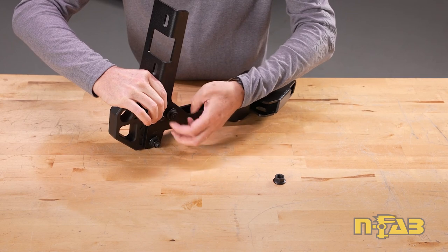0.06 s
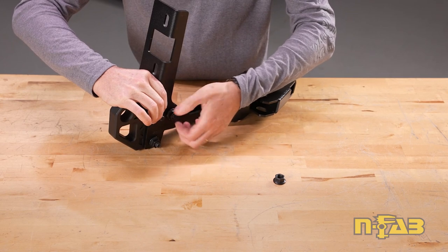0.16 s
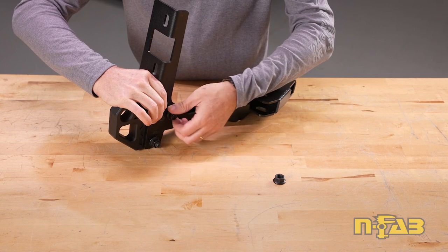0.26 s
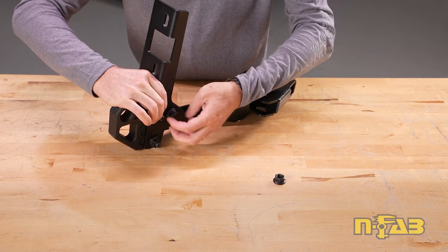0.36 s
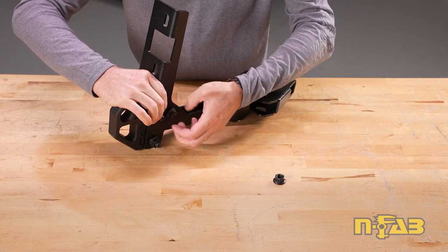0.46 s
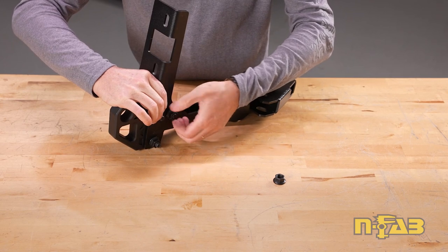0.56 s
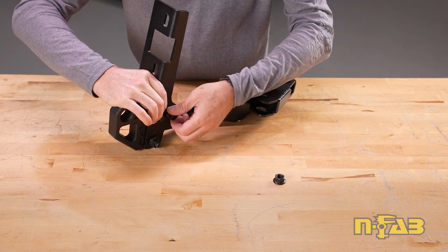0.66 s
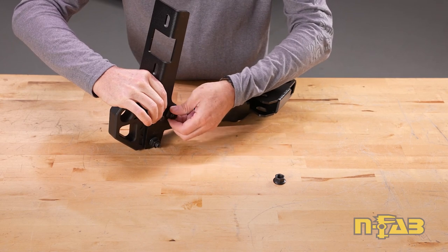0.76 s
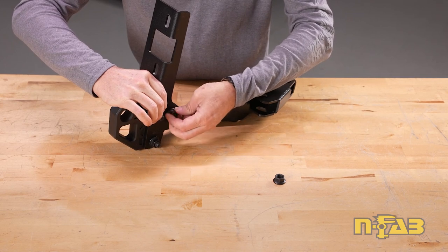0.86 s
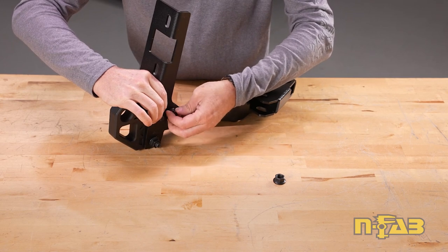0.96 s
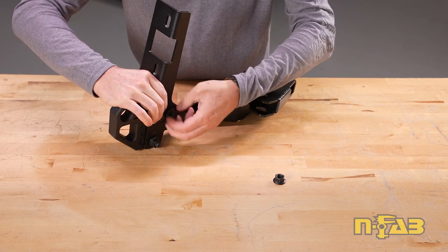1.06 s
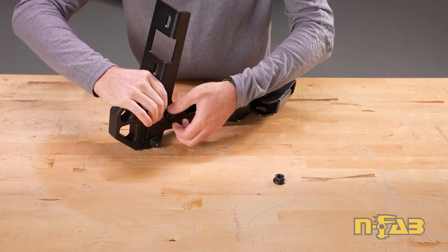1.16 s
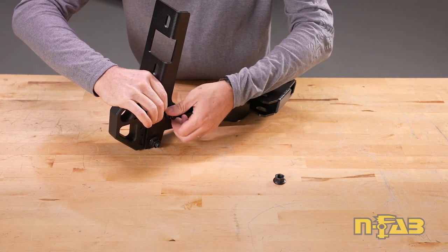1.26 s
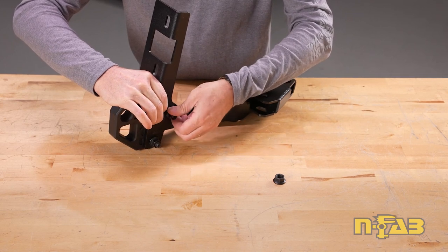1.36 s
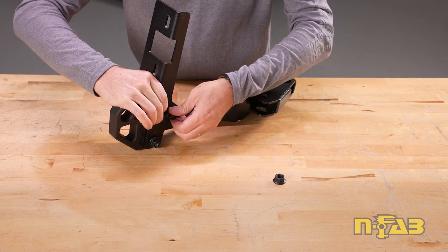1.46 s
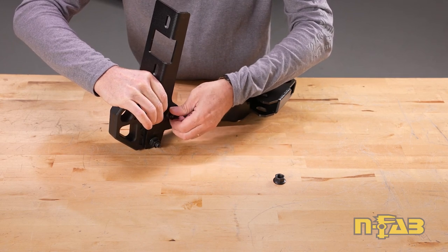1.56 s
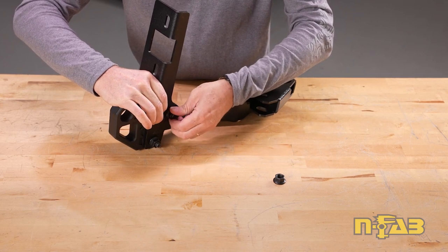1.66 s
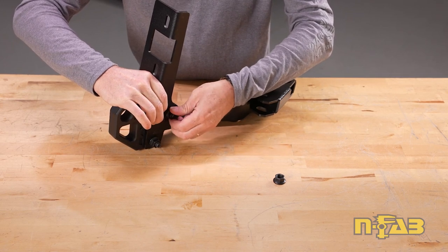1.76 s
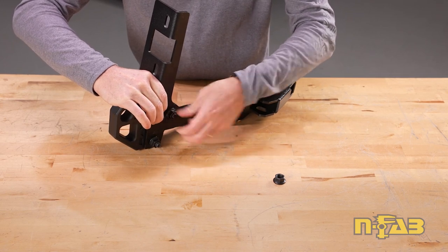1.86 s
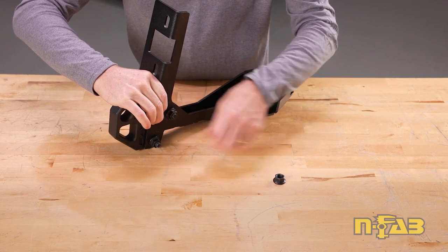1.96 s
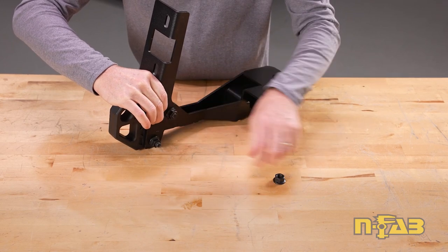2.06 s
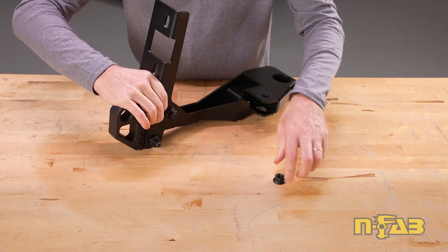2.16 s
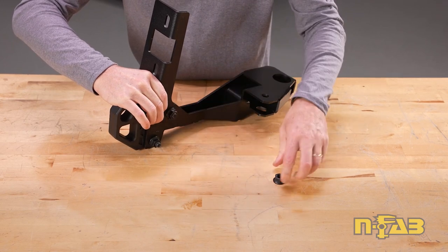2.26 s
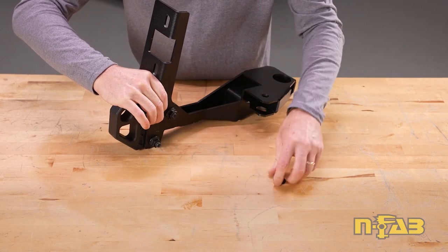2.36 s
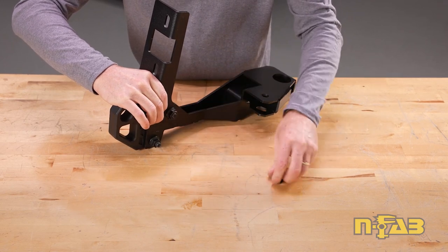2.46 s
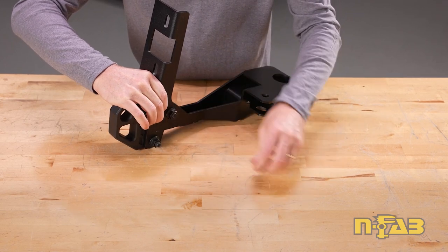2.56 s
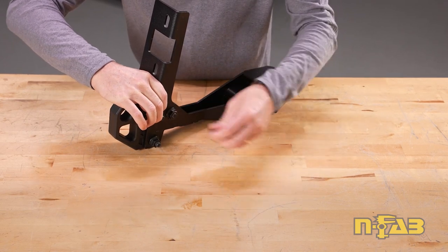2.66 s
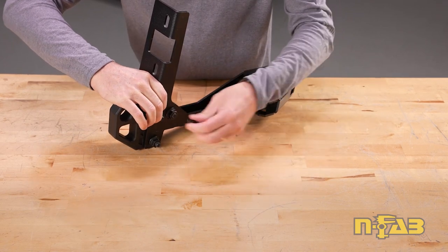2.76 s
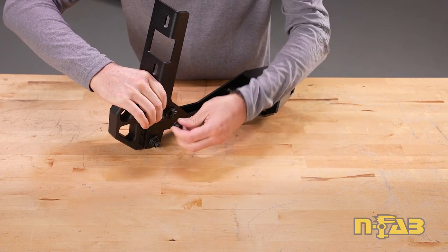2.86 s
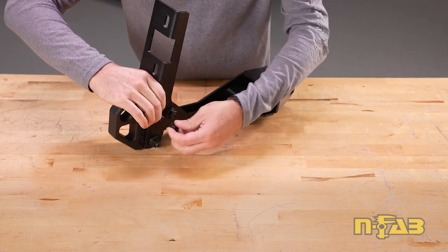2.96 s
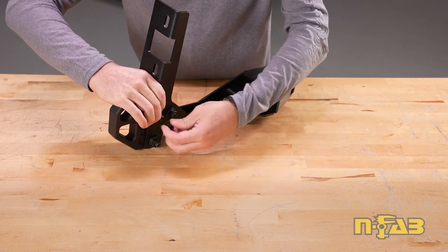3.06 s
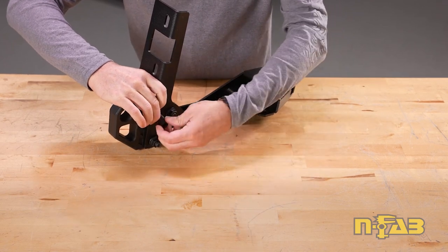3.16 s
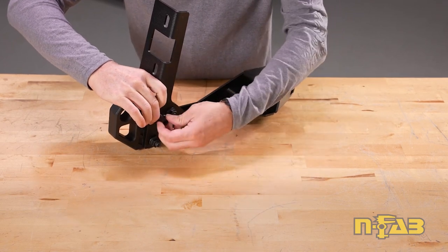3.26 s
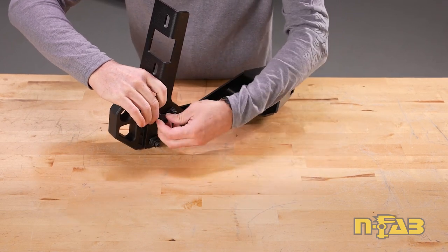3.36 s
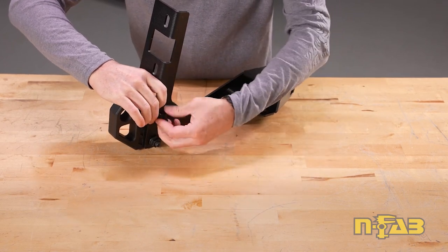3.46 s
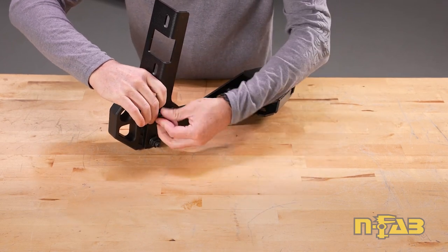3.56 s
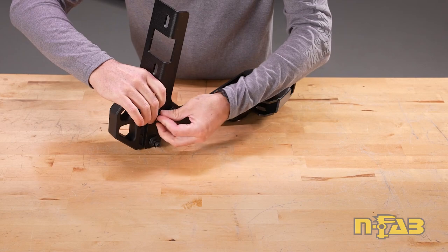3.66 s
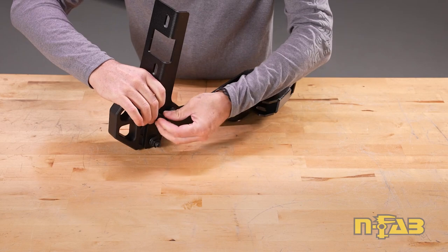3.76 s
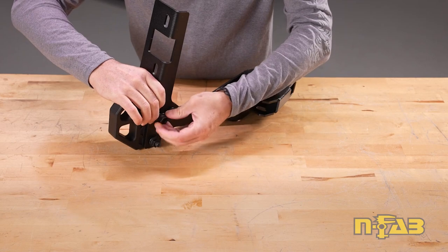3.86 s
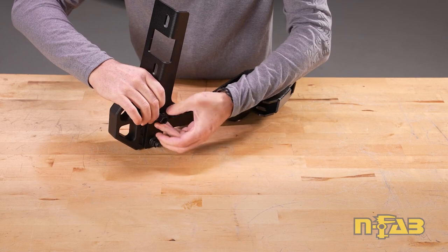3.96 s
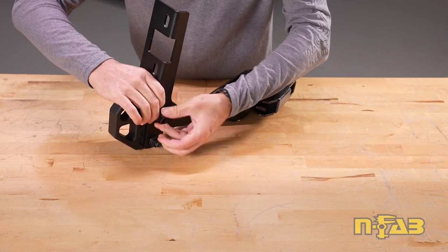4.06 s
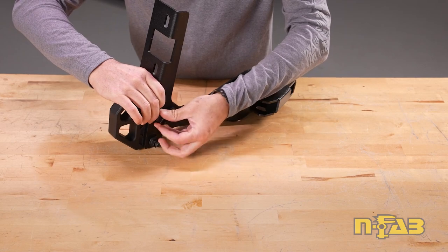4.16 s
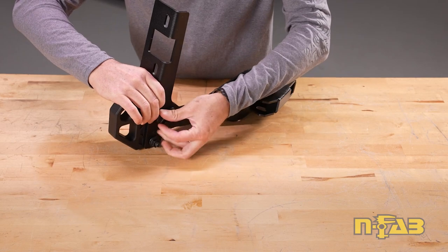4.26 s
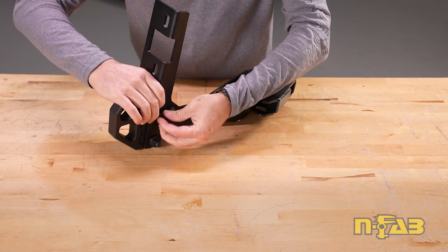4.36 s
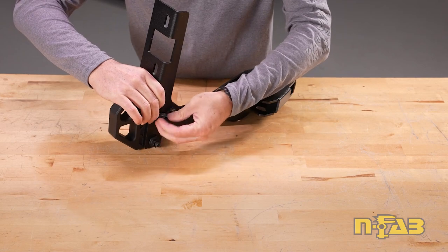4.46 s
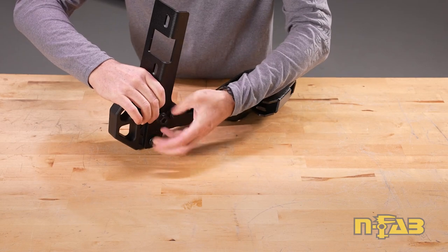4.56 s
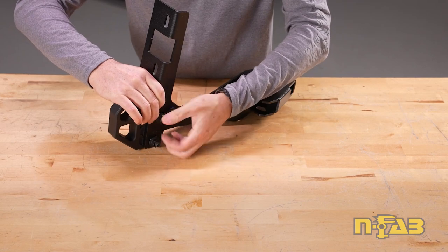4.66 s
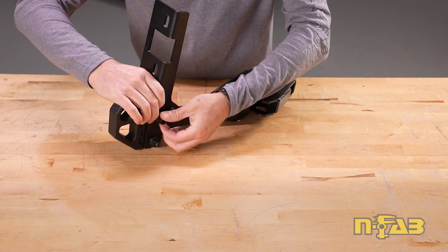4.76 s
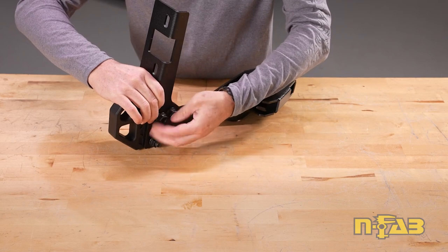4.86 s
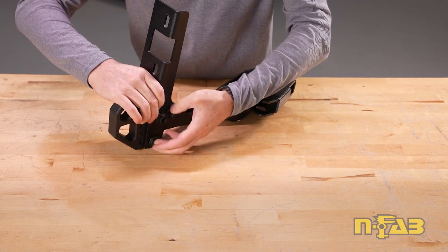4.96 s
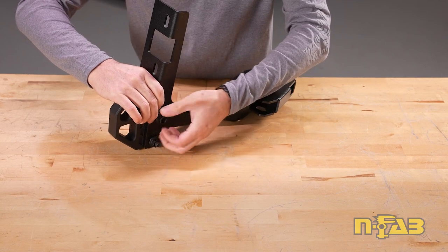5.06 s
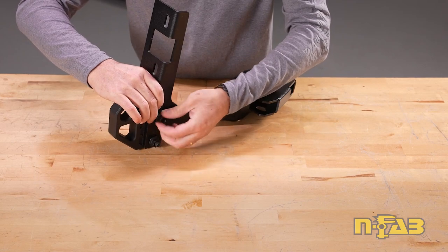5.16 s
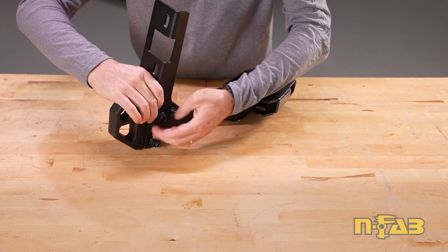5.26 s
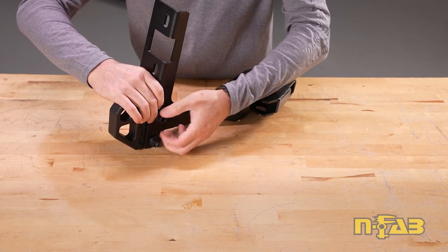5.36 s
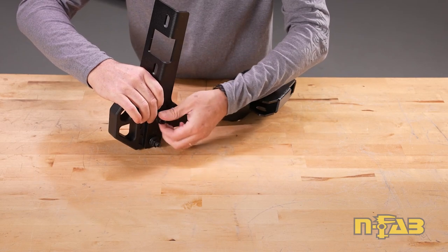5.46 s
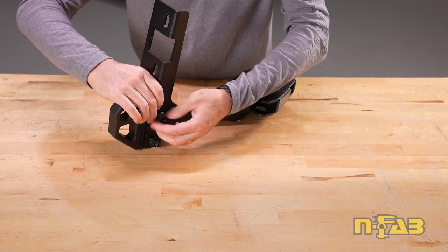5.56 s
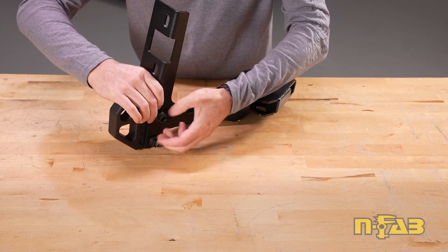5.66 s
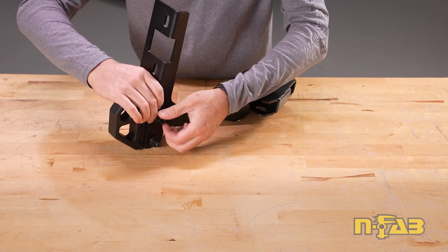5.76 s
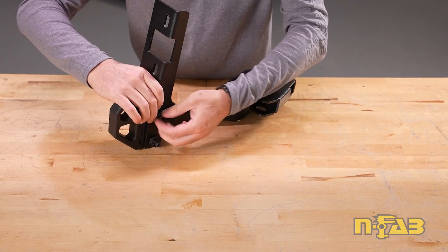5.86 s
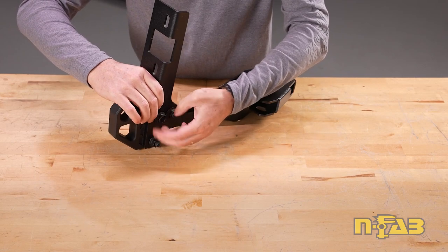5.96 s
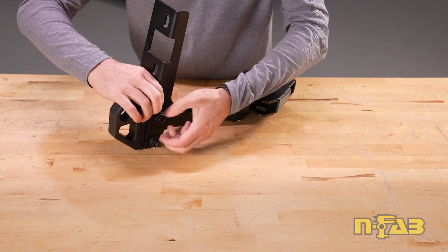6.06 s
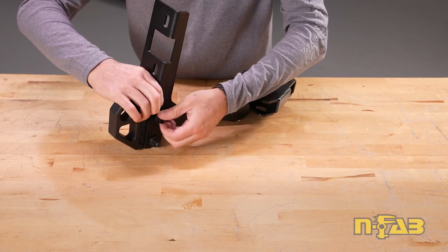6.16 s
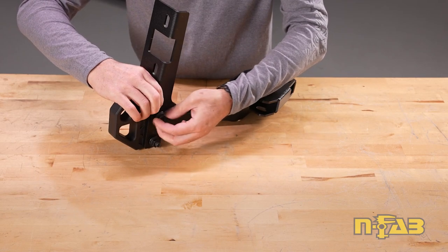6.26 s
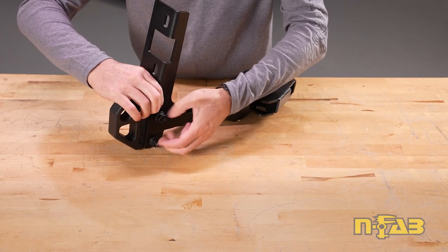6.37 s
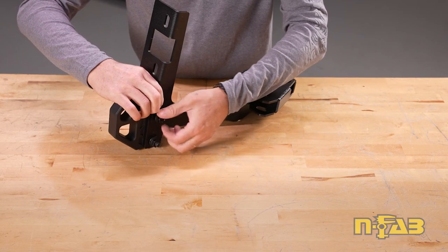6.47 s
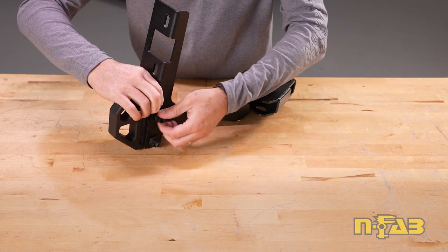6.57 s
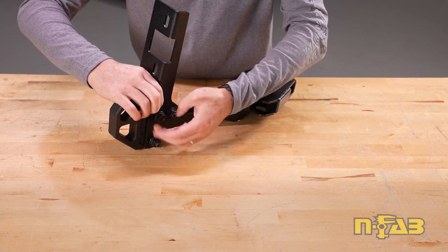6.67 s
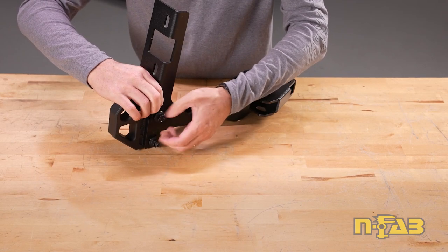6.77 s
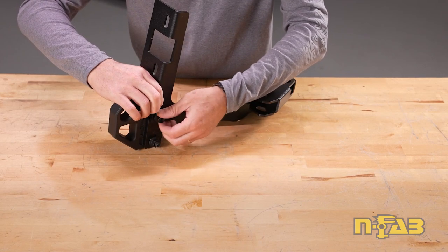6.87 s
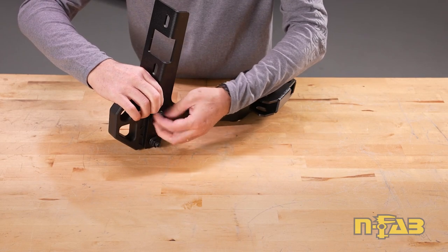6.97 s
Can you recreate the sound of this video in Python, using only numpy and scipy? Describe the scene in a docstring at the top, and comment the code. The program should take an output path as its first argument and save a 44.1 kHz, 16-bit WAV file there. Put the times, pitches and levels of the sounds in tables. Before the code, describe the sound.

Close by in a quiet, humming workshop, fingers tighten two nuts on a steel bracket. The first sticks and slips with light metallic ticks, and the bracket bumps the wooden bench. After a short pause and a small scuff, the second nut clicks onto its bolt, then turns in a series of brief scraping twists mixed with clinks, each leaving a thin, faint ring.

```python
"""Two nuts tightened by hand

Two nuts are spun finger-tight onto bolts through a steel bracket held on a wooden bench.
The first judders home. The second is picked up, clicks against its bolt and turns in short rasps.
Every knock and scrape rings the nut and the hand-muffled bracket, and the bench thumps below.
A quiet workshop hums all around."""
import sys
import numpy as np
from scipy import signal
from scipy.fft import rfft, irfft, next_fast_len
from scipy.io import wavfile
from scipy.ndimage import uniform_filter1d, map_coordinates

SR = 44100
rng = np.random.default_rng(int(sys.argv[2]) if len(sys.argv) > 2 else 0)


def digitize_waveform(pressure):
    """Quantize a signal to 16-bit integers and store it at the path in sys.argv[1].

    Rows of a 2-D input are taken as channels; values are limited to [-1, 1].
    """
    field = np.atleast_2d(pressure).T
    bounded = np.clip(field, -1, 1)
    quanta = np.round(bounded * 32767).astype(np.int16)
    wavfile.write(sys.argv[1], SR, quanta)


N = 309141
T = np.arange(SR // 2) / SR  # half a second of time for one short sound


def amp(db):
    """Turn decibels into a volume factor."""
    return 10 ** (np.asarray(db) / 20)


def unit(x):
    """Scale to an average strength (rms) of 1."""
    return x / np.sqrt(np.mean(x ** 2) + 1e-20)


def unit_peak(x, size=130):
    """Scale so that the loudest few milliseconds have strength 1."""
    return x / np.sqrt(uniform_filter1d(x ** 2, size).max() + 1e-20)


def along(points, hz):
    """Read between (frequency, value) points on a log frequency scale."""
    f, v = np.transpose(points)
    return np.interp(np.log(hz + 1), np.log(f + 1), v)


def wobble(rate, n):
    """A smooth curve through `rate` random values a second."""
    values = rng.standard_normal(int(n * rate / SR) + 4)
    return map_coordinates(values, [np.arange(n) * rate / SR])


def coloured(spectrum, n):
    """Noise of strength 1 with the given mix of lows and highs."""
    gain = amp(along(spectrum, np.fft.rfftfreq(n, 1 / SR)))
    return unit(irfft(rfft(rng.standard_normal(n)) * gain, n))


def add(track, s, x):
    """Mix x into the track, starting at s seconds."""
    i = max(round(s * SR), 0)
    track[i:i + len(x)] += x[:max(len(track) - i, 0)]


def ring(tones):
    """Tones of a struck object; each drops 60 dB in its fade time."""
    return sum(amp(db - 60 * T / fade) * np.sin(2 * np.pi * hz * T) for hz, db, fade in tones)


# noise colours of the ventilation and the rumble: f/Hz, level/dB
AIR_COLOUR = [(12, -58.5), (20, -23.5), (43, -16), (65, -24), (86, -9.5), (120, -17.5), (146, -12),
              (241, -18.5), (527, -25), (718, -28), (897, -27.5), (976, -29.5), (1810, -37), (12800, -42.5),
              (16000, -57)]
RUMBLE_COLOUR = [(10, -20.5), (30, -5.5), (56, -3), (80, -11.5), (130, -7.5), (250, -38.5), (1000, -84.5)]
# tones of a motor: f/Hz, level/dB
MOTOR_TONES = [(59, -68.5), (118.5, -73.5), (179, -78.5), (237, -79.5), (360, -81)]
def workshop(air_db=-68, waver_db=6.0, rumble_db=-69, swell_db=4):
    """A wavering motor hum, a swelling rumble and rushing ventilation."""
    t = np.arange(N) / SR
    hum = np.zeros(N)
    for hz, db in MOTOR_TONES:
        strength = amp(db + waver_db * wobble(6.7, N))
        hum += strength * np.sqrt(2) * np.sin(2 * np.pi * hz * t + .5 * wobble(6.7, N))
    rumble = amp(rumble_db + swell_db * wobble(14, N)) * coloured(RUMBLE_COLOUR, N)
    return hum + rumble + amp(air_db) * coloured(AIR_COLOUR, N)


# how long the room echoes: f/Hz, fade/s
ROOM_FADES = [(150, 0.68), (400, 0.38), (1200, 0.47), (3500, 0.48), (9000, 0.42), (15000, 0.4)]
def room(x):
    """A smooth echo in which each frequency dies at its own speed."""
    hz, t, noise = signal.stft(rng.standard_normal(SR), SR, nperseg=256)
    fading = amp(-60 * t / along(ROOM_FADES, hz)[:, None])
    tail = signal.istft(noise * fading, SR, nperseg=256)[1]
    tail *= 1 - np.exp(-np.arange(len(tail)) / SR / 0.0031)
    return signal.fftconvolve(x, tail / np.linalg.norm(tail))[:N]


# the bracket tips onto the wood: t/s, level/dB
ROCKS = [(0.287, -45), (0.692, -45), (0.805, -35), (0.868, -37), (1.588, -32), (2.724, -29.5),
         (4.034, -49.5), (4.84, -38)]
# tones of the bench top: f/Hz, level/dB, fade/s
BOOM_TONES = [(184, 3, 0.11), (190, -18, 0.12), (192, -11.5, 0.73), (309, -3, 0.24)]
def bench_booms(gain_db=-1):
    """The bench booms when the bracket rocks onto it."""
    out = np.zeros(N)
    boom = unit_peak(ring(BOOM_TONES) * (1 - np.exp(-T / 0.001)))
    for s, db in ROCKS:
        add(out, s, amp(db + gain_db) * boom)
    return out


# deep tones of the bending bench top: f/Hz, level/dB, fade/s
THUMP_TONES = [(30, -0.5, 0.017), (56.7, 0, 0.096), (87, -2.5, 0.091)]
def bench_thumps(clicks, gain_db=-9, limit_db=-36.5):
    """The bench gives under each click, more for a firm one, up to a limit."""
    out = np.zeros(N)
    thump = unit_peak(ring(THUMP_TONES) * (1 - np.exp(-T / 0.0066)))
    for s, db, *_ in clicks:
        add(out, s, amp(min(db + gain_db, limit_db)) * thump)
    return out


# the nut brushes the wood: t/s, level/dB
SCUFFS = [(2.365, -43.5), (2.375, -50.5)]
# noise colour of a scuff: f/Hz, level/dB
SCUFF_COLOUR = [(150, -33.5), (250, -6), (763, 1), (1160, -14.5), (1490, -2), (1940, -21.5), (2170, -5.5),
                (2990, -28.5), (3210, -23), (3790, -38.5), (7000, -49.5), (9100, -73), (15400, -120)]
def bench_scuffs(gain_db=-3, fade_s=0.13):
    """The loose nut scuffs the bench as it is lifted."""
    out = np.zeros(N)
    for s, db in SCUFFS:
        scuff = coloured(SCUFF_COLOUR, len(T)) * amp(-60 * T / fade_s) * (1 - np.exp(-T / 0.0017))
        add(out, s, amp(db + gain_db) * unit_peak(scuff))
    return out


# the bracket's free end starts to sing: t/s, level/dB, extra for overtones/dB
SINGS = [(.83, -75, -18), (2.718, -57.5, 2.5), (4.829, -60.5, -23.5), (5.18, -63, -15), (5.52, -72, -0.5),
         (5.87, -47.5, -32)]
# its main tone, then two overtones: f/Hz, level/dB, fade/s
FREE_END_TONES = [(2799, 0, .7), (4204, 7, .45), (5410, 4, .2)]
def free_end():
    """The end of the bracket that no hand muffles rings on faintly."""
    out = np.zeros(N)
    main, overtones = ring(FREE_END_TONES[:1]), ring(FREE_END_TONES[1:])
    for s, db, overtones_db in SINGS:
        add(out, s, amp(db) * (main + amp(overtones_db) * overtones))
    return out


# slow-fading tones of the steel: f/Hz, level/dB, fade/s
LINGERING_TONES = [(1300, -9, .3), (1972, 9.5, 0.82), (2020, 1.5, 0.46), (2700, -9.5, .25),
                   (2810, 1.5, 0.96), (3420, -8.5, 0.36), (3478, -7.5, 0.51), (4204, 8, .4), (4690, 3, .2),
                   (5470, 7, .2), (7060, 4, 0.27), (9243, -10.5, .35)]
def after_ring(steel, gain_db=-32):
    """Thin steel tones outlast the touches that feed them."""
    tones = ring(LINGERING_TONES)
    return amp(gain_db) * signal.fftconvolve(steel, tones / np.linalg.norm(tones))[:N]


# the nut touches its bolt softly: t/s, level/dB, rise/s
TAPS = [(1.303, -31, 0.00063), (2.676, -39.5, 0.004)]
# tones of a tap: f/Hz, level/dB, fade/s
TAP_TONES = [(450, -10, 0.074), (1063, -9, 0.034), (1190, -4.5, 0.042), (1180, -3.5, 0.12),
             (1950, -4, 0.055), (2124, -8, .05), (2180, -8, 0.094), (2500, -27, .06)]
def nut_taps():
    """Cushioned by a finger, the nut's soft taps wake only the lower tones."""
    out = np.zeros(N)
    for s, db, rise in TAPS:
        add(out, s, amp(db) * unit_peak(ring(TAP_TONES) * (1 - np.exp(-T / rise))))
    return out


def blow_response(gain):
    """The sound of one sharp blow, with this spectrum and an energy of 1."""
    cepstrum = irfft(np.log(np.maximum(gain / gain.max(), 1e-6)))
    half = len(cepstrum) // 2
    # folding onto the first half puts all the ringing after the blow
    cepstrum[1:half] *= 2
    cepstrum[half + 1:] = 0
    response = irfft(np.exp(rfft(cepstrum)))[:half]
    return response / np.linalg.norm(response)


# tones of the bracket's plates: f/Hz, width/Hz, level/dB
PLATE_TONES = [(817, 12, -8.5), (920, 70, -25.5), (1063, 55, -5.5), (1137, 30, -6.5), (1170.3, 18, 2.5),
               (1283, 72, -11), (1447, 59, -13.5), (1603, 50, -13.5)]
# ranges of the five parts (frame, plate, flange, bolt, nut): lowest f/Hz, highest f/Hz
PART_RANGES = [(140, 720), (720, 1700), (1700, 2700), (2700, 7500), (7500, 12200)]
def bracket(frame_tones, high_tones, weak_tones, weak_db, size=16384, steepness=20):
    """How each of the five steel parts rings after a blow, in its own range of pitch."""
    f = np.fft.rfftfreq(size, 1 / SR) + 1

    def peaks(tones):
        return sum(amp(db) ** 2 / (1 + (2 * (f - hz) / width) ** 2) for hz, width, db in tones)

    highs = peaks(high_tones) + amp(weak_db + along(weak_tones, f)) ** 2
    powers = [peaks(frame_tones), peaks(PLATE_TONES), highs, highs, highs]
    parts = []
    for power, (low, high) in zip(powers, PART_RANGES):
        in_range = power / (1 + (low / f) ** steepness) / (1 + (f / high) ** steepness)
        parts.append(blow_response(np.sqrt(in_range)))
    return parts


def part_levels(db, hardness_db, nut_db, firm_db=-41):
    """A hard touch favours bolt and nut; a soft or light one favours the frame."""
    frame = -0.39 * hardness_db + 0.12 * (firm_db - db)
    flange = 0.16 * hardness_db
    return db + np.array([frame, 0, flange, hardness_db, hardness_db + nut_db])


def knocks(events, parts, blow, trims_db, stretches):
    """Each knock is one blow and a dying chatter of tiny hits that ring the five parts."""
    out = np.zeros(N)
    for s, *touch in events:
        for part, db, trim_db, stretch in zip(parts, part_levels(*touch), trims_db, stretches):
            chatter_s = stretch * 0.062
            force = rng.standard_normal(len(part)) * amp(-60 * T[:len(part)] / chatter_s)
            force /= np.linalg.norm(force)
            force[0] += blow
            add(out, s, amp(db + trim_db) * unit_peak(signal.fftconvolve(force, part)))
    return out


def finger_push(t, rise, hold, sag_db_per_s=67, release_db_per_s=451):
    """One turn swells, sags as the fingers run out of reach, and is let go."""
    fade_db = sag_db_per_s * np.maximum(t - rise, 0) + release_db_per_s * np.maximum(t - rise - hold, 0)
    return np.clip(t / rise, 0, 1) ** 1.09 * amp(-fade_db)


def thread_rasp(turns, parts, catches_per_s, catch_db, uneven_db, trims_db):
    """Screw threads slide: smooth rubbing plus tiny catches, under uneven finger pressure."""
    release_s, bite_s, spread_db = 0.13, 0.013, 2
    bite_shares = [0, 0, 0, 1, 0.74]  # only bolt and nut squeak
    drives = np.zeros((len(parts), N))
    for s, rise, hold, db, hardness_db, nut_db, bite_db in turns:
        t = np.arange(max(-s, 0), rise + hold + release_s, 1 / SR)
        sizes = rng.standard_normal(len(T)) * amp(spread_db * rng.standard_normal(len(T)))
        catches = (rng.random(len(T)) < catches_per_s / SR) * sizes
        pressure = amp(uneven_db * wobble(135.0, len(T)))
        grind = unit(pressure * (rng.standard_normal(len(T)) + amp(catch_db) * unit(catches)))
        force = np.resize(grind, len(t)) * finger_push(t, rise, hold)
        bite = bite_db * np.exp(-((t - rise) / bite_s) ** 2)  # the thread bites at the hardest push
        levels = part_levels(db, hardness_db, nut_db) + trims_db
        for drive, level, share in zip(drives, levels, bite_shares):
            add(drive, s, force * amp(level + share * bite))
    return sum(signal.fftconvolve(drive, part)[:N] for drive, part in zip(drives, parts))


# low frame tones and high steel tones at the first bolt: f/Hz, width/Hz, level/dB
FIRST_FRAME = [(180, 11.6, -4), (330, 5.2, -0.5), (386, 9.8, -19), (410, 26, -15), (463, 12, 0.5),
               (625, 23, -19)]
FIRST_HIGHS = [(1847, 39, 8.5), (2103, 41, 7), (2200, 22.6, 12), (2335, 72, 1.5), (2570, 25, 7),
               (2824, 6, 1.5), (3117, 29, 1), (3470, 40, -3.5), (3725, 60, -9), (4020, 43, -3),
               (4410, 68, -9), (4640, 26, -6), (4640, 30, -12), (5370, 65, -13.5), (5870, 54, -11),
               (6210, 51, -27), (6750, 34, -24), (8800, 20, -25), (9600, 93, -19), (10600, 76, -29),
               (11650, 70, -28.5)]
# the crowd of weak tones between the high ones: f/Hz, level/dB
FIRST_WEAK = [(1700, -16), (3000, -4), (4500, -16), (7500, -30), (10000, -27.5), (12000, -53), (12600, -42),
              (16000, -54)]
# the nut slips on its thread: t/s, level/dB, hardness/dB, nut over bolt/dB
SLIPS = [(0.229, -41, 2, -24), (0.5587, -45.5, 7, -9), (0.597, -47.5, 4.5, -30), (0.637, -41, -0.5, -22),
         (0.6694, -36.5, -1, -22), (0.691, -36, -5, -11.5), (0.7108, -37.5, -6.5, -12),
         (0.7737, -43.5, -5, -11), (0.8001, -38, -1.5, -13.5), (0.8209, -31.5, 0.5, -11),
         (0.8539, -36, -2, -7), (0.8624, -37, -14, -7), (1.1984, -62, -8, -6), (1.2648, -52.5, -3.5, -14),
         (1.4203, -51, -10, 0.5), (1.4458, -54, -10, 0), (1.5317, -49.5, -6, -1.5), (1.764, -68.5, 2, 1)]
# finger turns: t/s, rise/s, hold/s, level/dB, hardness/dB, nut over bolt/dB, bite/dB
FIRST_TURNS = [(-0.2, 0.25, 0.005, -47, 2, -19, -3), (0.235, 0.034, 0.016, -43.5, -3.5, -12, 7)]
def first_nut():
    """Nearly home, the first nut sticks and slips."""
    parts = bracket(FIRST_FRAME, FIRST_HIGHS, FIRST_WEAK, weak_db=-4.5)
    slips = knocks(SLIPS, parts, blow=0.37, trims_db=[-4, -2, -3, -1.5, 1],
                   stretches=[1.6, 0.78, 0.88, 1.25, 1.57])
    rasp = thread_rasp(FIRST_TURNS, parts, catches_per_s=550, catch_db=-3, uneven_db=0.4,
                       trims_db=[-1.5, 0.5, 3, 1, 1.5])
    return slips + rasp


# low frame tones and high steel tones at the second bolt: f/Hz, width/Hz, level/dB
SECOND_FRAME = [(185, 16, -6.5), (333, 8.9, -6), (357, 11, -6), (426, 14, -6), (468.6, 8, 3.5),
                (641.3, 9.1, -11)]
SECOND_HIGHS = [(1863, 37, 11), (2090, 120, -2), (2199, 58, 6.5), (2589, 32, 5), (2680, 36, -0.5),
                (2900, 110, -4.5), (3130, 90, 3.5), (3320, 52, 3.5), (3490, 54, -0.5), (3808, 81, 2.5),
                (4200, 60, -10), (4080, 49, -1), (4330, 57, -3.5), (4930, 19, -13.5), (4970, 25, -7),
                (5485, 210, -11), (6225, 37, -8.5), (6320, 35, -15.5), (6760, 33, -14.5), (8740, 45, -19.5),
                (8900, 160, -12.5), (9200, 98, 0), (9345, 66, 0), (9600, 76, -14.5), (11600, 67, -28),
                (12500, 81, -32.5)]
# the crowd of weak tones between the high ones: f/Hz, level/dB
SECOND_WEAK = [(1700, -18.5), (3500, -16.5), (4700, -26), (7500, -34), (9300, -32.5), (10500, -29),
               (12000, -40.5), (12700, -45.5), (16000, -51)]
# the loose nut knocks on its bolt: t/s, level/dB, hardness/dB, nut over bolt/dB
CLICKS = [(2.6118, -54.5, -25, 11), (2.7159, -20.5, 1.5, -18.5), (3.1177, -32.5, -2, 13),
          (3.2102, -44.5, 0.5, -27), (3.246, -41, 0, 9), (3.323, -39, -2, -9), (3.4214, -51, -14, -6),
          (3.6635, -43.5, -7, 2), (4.0313, -57.5, -31, -1), (4.1739, -41, -8.5, -1),
          (4.2011, -42.5, -22, 1), (4.412, -37.5, -4, 7), (4.4276, -28, -0.5, 11), (4.6969, -46, 0, -2),
          (4.7051, -30.5, -2, 5), (4.8313, -43, 4.5, 7), (5.064, -52.5, -2, -9), (5.0783, -41.5, 2, 2.5),
          (5.5193, -26, -2.5, 15), (5.7524, -31.5, 1.5, 7.5), (5.8213, -44.5, 7.5, -7),
          (5.851, -42.5, 6.5, -5), (5.8786, -36.5, 0, 4), (6.103, -40.5, 3.5, -8.5),
          (6.121, -47, 10.5, -11), (6.198, -40, 10.5, -6.5), (6.248, -42, 5.5, 2.5),
          (6.2942, -40.5, 1, -14), (6.4723, -41.5, 6, -5.5), (6.8227, -39.5, 7, -7)]
# finger turns: t/s, rise/s, hold/s, level/dB, hardness/dB, nut over bolt/dB, bite/dB
SECOND_TURNS = [(3.14, 0.035, 0.12, -55.5, -4.5, -6, 4), (3.42, 0.025, 0.2, -56.5, -9, -7, -5),
                (3.56, 0.1, 0.14, -59, -6.5, 1.5, 1), (4.24, 0.13, 0.016, -45.5, -5.5, -2.5, 5),
                (4.70, 0.12, 0.0089, -39.5, -5, -3, 1), (5.10, 0.069, 0.052, -37, -6, -4, 8.5),
                (5.42, 0.089, 0.0099, -38, -2.5, -4, 9.5), (5.79, 0.07, 0.04, -43, -1.5, -9, 14.5),
                (6.12, 0.086, 0.066, -41, -2, -6, 15), (6.48, 0.094, 0.13, -40.5, -2, -5, 8.5),
                (6.85, 0.081, 0.096, -38.5, -2, -6, 7.5)]
def second_nut():
    """Still loose, the second nut clicks and rings brightly as it runs down the bolt."""
    parts = bracket(SECOND_FRAME, SECOND_HIGHS, SECOND_WEAK, weak_db=-13)
    clicks = knocks(CLICKS, parts, blow=0.43, trims_db=[-8, -1.1, -9.5, -3.5, -4.5],
                    stretches=[2.1, 0.92, 1.9, 0.82, 0.52])
    rasp = thread_rasp(SECOND_TURNS, parts, catches_per_s=400, catch_db=-3.5, uneven_db=2.4,
                       trims_db=[-3.5, 0.5, -1.5, -1.5, -2])
    return clicks + rasp


def scene(echo_db=-20.5):
    """The work, close by, with a little echo and the workshop around it."""
    steel = first_nut() + second_nut() + nut_taps()
    bench = bench_booms() + bench_thumps(CLICKS) + bench_scuffs()
    work = steel + after_ring(steel) + bench + free_end()
    return (work + amp(echo_db) * room(work) + workshop())[None]


def record(dry, top_hz=15700):
    """Cut away the very highest treble."""
    size = next_fast_len(N + SR // 2)
    kept = np.fft.rfftfreq(size, 1 / SR) < top_hz
    return irfft(rfft(dry, size) * kept, size)[:, :N]


dry = scene()
out = record(dry)
digitize_waveform(out)
```